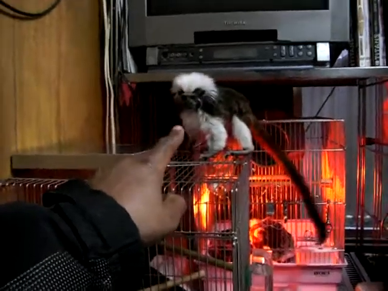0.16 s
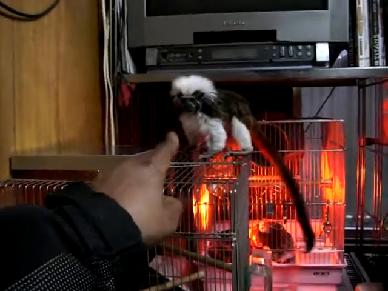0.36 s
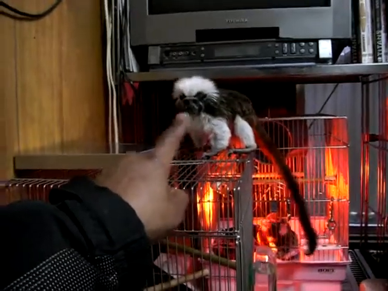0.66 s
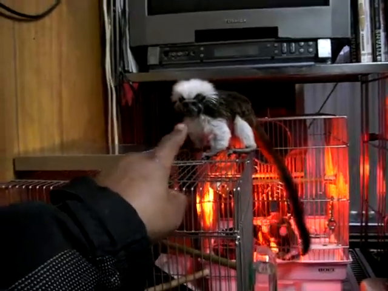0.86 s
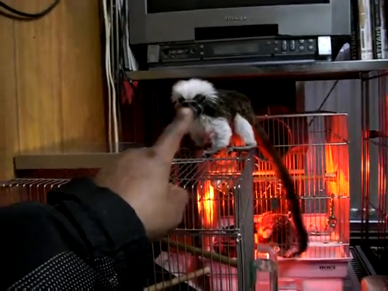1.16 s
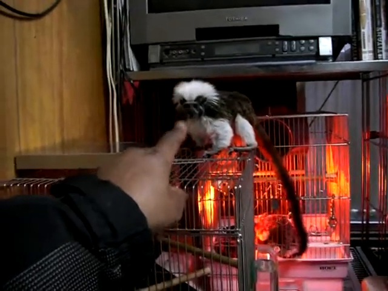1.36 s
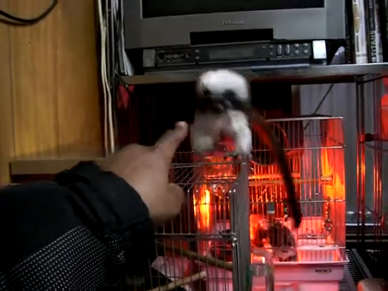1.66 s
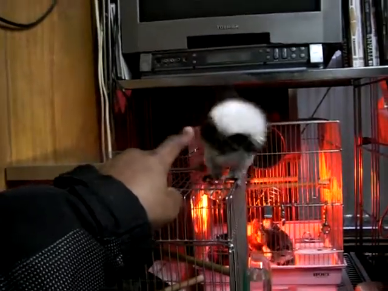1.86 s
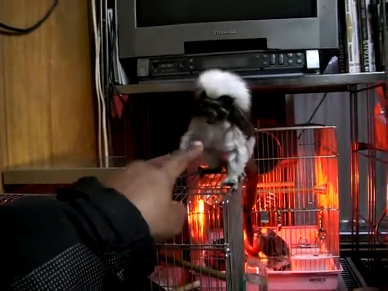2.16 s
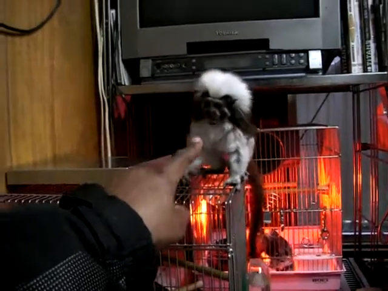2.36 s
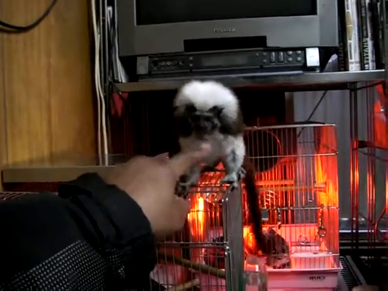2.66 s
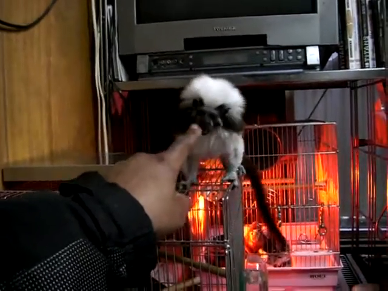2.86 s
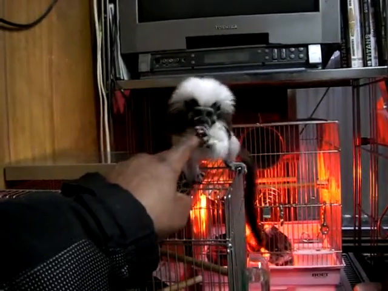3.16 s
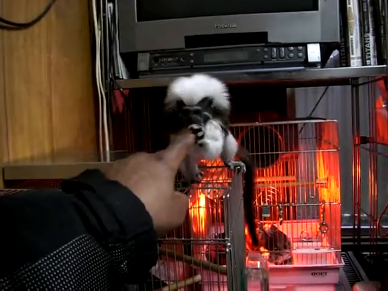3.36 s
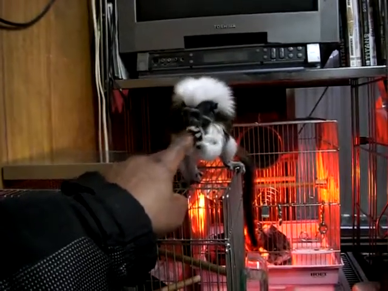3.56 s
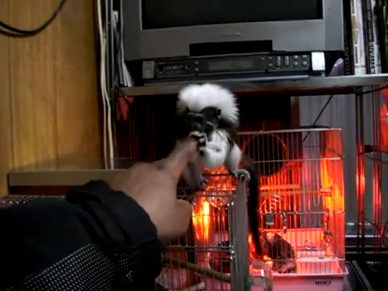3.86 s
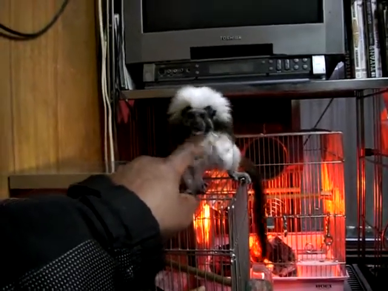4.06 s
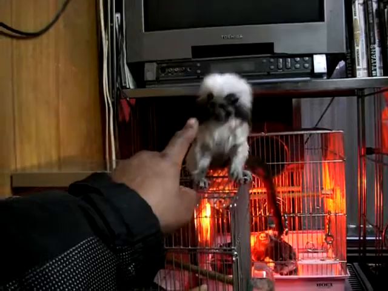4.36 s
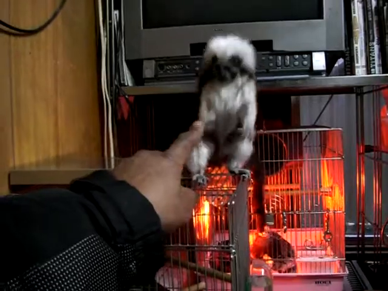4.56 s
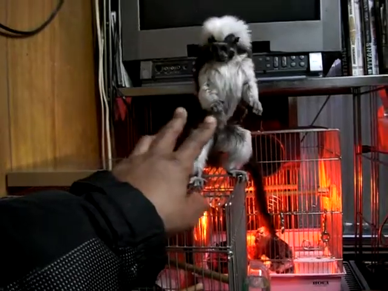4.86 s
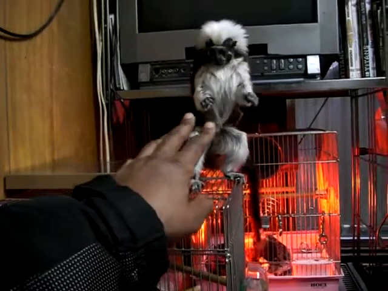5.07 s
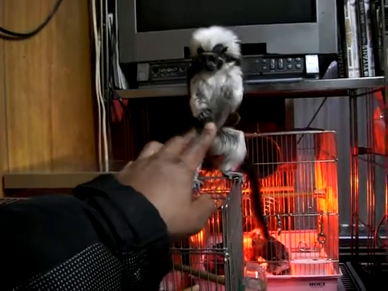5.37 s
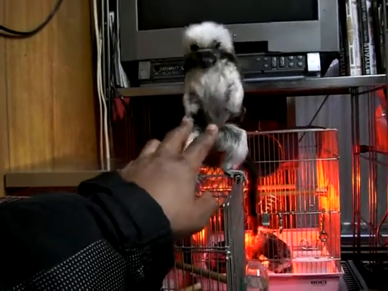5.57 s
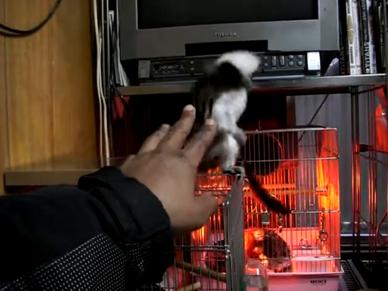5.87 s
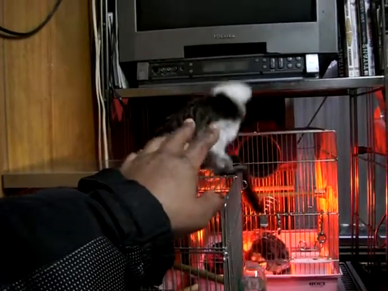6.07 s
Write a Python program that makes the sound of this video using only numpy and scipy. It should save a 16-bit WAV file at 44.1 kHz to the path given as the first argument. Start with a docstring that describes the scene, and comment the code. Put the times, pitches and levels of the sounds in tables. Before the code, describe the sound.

A small tamarin on a wire cage calls close by in a small room. A tiny falling peep leads straight into two long, slowly rising whistles that swell brighter. Soft foot thuds, faint scuffs and claw ticks on wire follow, then five very high, quick falling chirps and a whistle that plunges, levels and curls up. Steady low motor hum and soft room noise lie underneath, in stereo with a short room tail.

```python
"""A small tamarin calls from the top of a wire cage: a falling peep, two long whistles, five very high
chirps and a sliding whistle. Its voice is a wavering sum of harmonics, with a hiss that follows its loudness.
Its feet and claws add decaying thuds, filtered-noise scuffs and ticks that ring the resonant wires.
Nearby surfaces return treble echoes and a short diffuse tail.
Under it all an appliance hums as a set of sine lines over coloured room noise."""
import sys
import numpy as np
from scipy import signal
from scipy.fft import rfft, irfft
from scipy.io import wavfile

SR = 44100
rng = np.random.default_rng(int(sys.argv[2]) if len(sys.argv) > 2 else 0)


def transcribe(u):
    """Save the signal u as a 16-bit wav file named by the first command-line argument.

    u: samples, shape (n,) or (channels, n), limited to [-1, 1]; the rate is SR.
    q: integer samples, one column per channel.
    """
    v = np.clip(np.atleast_2d(u).T, -1, 1)
    q = np.round(v * 32767).astype(np.int16)
    wavfile.write(sys.argv[1], SR, q)


N = 273420
TIME = np.arange(N) / SR


def monkey():
    """Superposition: the calls add as independent pressure waves."""
    return peep() + long_whistles() + chirps() + sliding_whistle()


# throat resonance on the overtones of the peep: frequency_hz, relative_level_db
PEEP_RESONANCE = [(4200, 6.5), (6300, -5.5), (8400, -0.5), (10500, -7.5), (12500, -22), (16000, -30)]


def peep():
    """Source-filter principle: the throat colours the overtones of the opening peep."""
    return call(sagging_peep(), PEEP_RESONANCE, jitter=.005, hiss_db=-28, edge_s=0.0019,
                flutter_db=3.0, rasp_db=0.5)


PEEP_LENGTH_S, PEEP_HZ, PEEP_SAG_HZ, PEEP_SAG_S = .09, 2008, 284, .025
PEEP_DB, PEEP_OVERTONES_DB = -39, -44.5


def sagging_peep():
    """Exponential relaxation: the pitch settles to a steady value under level controls that stay even."""
    age = np.arange(0, PEEP_LENGTH_S, 1 / SR)
    pitch = PEEP_HZ + PEEP_SAG_HZ * np.exp(-age / PEEP_SAG_S)
    return age, pitch, PEEP_DB, PEEP_OVERTONES_DB


# long whistles, levels before the swell: start_s, length_s, fundamental_db, overtones_db, mouth_resonance_db,
# mouth_opens_after_s, fundamental_gain_db and overtone_gain_db at the widest opening
WHISTLE_SETTINGS = [(0.164, 0.348, -38, -37, -15, 0.17, 7.5, 5),
                    (0.621, 0.422, -37, -34.5, -4.5, 0.11, 3.5, 14.5)]
# pitch curve of each long whistle, a scoop up and then a slow climb: time_s, pitch_hz
WHISTLE_PITCH_CURVES = [
    [(0.163, 1488), (0.175, 1634), (0.191, 1690), (0.245, 1657), (0.389, 1708), (0.413, 1740),
     (0.477, 1755), (0.511, 1731)],
    [(0.621, 1424), (0.639, 1590), (0.663, 1709), (0.691, 1706), (0.927, 1776), (0.975, 1789),
     (1.031, 1813), (1.043, 1801)],
]
# throat resonance on the overtones of the whistles: frequency_hz, relative_level_db
WHISTLE_RESONANCE = [(3000, -4.5), (3500, -10), (5200, 0), (7000, 1.5), (8700, 1), (10400, -8),
                     (12200, -22.5), (15500, -24)]


def long_whistles():
    """Source-filter principle: the throat colours the overtones of two sustained tones."""
    return sum(call(whistle(pitch, *row), WHISTLE_RESONANCE, jitter=0.0016, hiss_db=-24.0, edge_s=.002,
                    flutter_db=2.5, rasp_db=-0.13, start_rasp_db=0.58)
               for pitch, row in zip(WHISTLE_PITCH_CURVES, WHISTLE_SETTINGS))


PUSH_DB, PUSH_AT_S, PUSH_WIDTH_S = 5.5, 0.022, 0.026  # the opening push brightens the tone
# the mouth snaps open to OPEN_SHARE; the other two are shares of the time that remains
OPEN_S, OPEN_SHARE, WIDEST_AT, WIDE_SHARE = 0.0032, 0.58, 0.65, 0.26
MOUTH_LIFT_DB = 23


def whistle(pitch_curve, start, length, fundamental_db, overtones_db, mouth_db, opens_s, swell_db, brighten_db):
    """Variable radiation: a whistle starts with a push and swells once the mouth opens."""
    age = np.arange(0, length, 1 / SR)
    pitch = np.interp(start + age, *np.transpose(pitch_curve))
    push = np.exp(-((age - PUSH_AT_S) / PUSH_WIDTH_S) ** 2)
    open_progress = (age - opens_s) / (length - opens_s)
    wide = np.exp(-((open_progress - WIDEST_AT) / WIDE_SHARE) ** 2)
    snap = (1 + np.tanh((age - opens_s) / OPEN_S)) / 2
    opening = snap * (OPEN_SHARE + (1 - OPEN_SHARE) * wide)
    return (start + age, pitch, fundamental_db + swell_db * opening,
            overtones_db + PUSH_DB * push + brighten_db * opening, mouth_db + MOUTH_LIFT_DB * opening)


# falling chirps: start_s, length_s, first_pitch_hz, last_pitch_hz before the final drop,
# bend (+ falls late, - falls early), final_drop (share of pitch), peak_db before colour, peak_after_s,
# last_overtones_db
CHIRP_SETTINGS = [(3.048, 0.046, 10050, 7570, 3, 0.18, -28.5, 0.023, -32),
                  (3.23, 0.031, 8500, 5850, 0.7, 0.12, -33.5, 0.0086, -39.5),
                  (3.631, 0.046, 10000, 7780, 1.3, 0.13, -28.5, 0.0084, -36),
                  (3.827, 0.055, 9200, 5400, -1.44, .08, -31, 0.0045, -42),
                  (4.024, 0.061, 7000, 3950, -0.85, 0.045, -33, 0.026, -42)]
# relative weights of a chirp's overtones; with a single overtone they leave its level unchanged:
# frequency_hz, relative_level_db
CHIRP_OVERTONE_WEIGHTS = [(8000, 2), (12000, -6), (30000, -53)]


def chirps():
    """Frequency modulation: five two-partial tones sweep rapidly downward."""
    return sum(call(chirp(*row), CHIRP_OVERTONE_WEIGHTS, jitter=0.006, hiss_db=-21, edge_s=0.0018, rasp_db=1.7,
                    flick_s=.0013, count=2) for row in CHIRP_SETTINGS)


# peaks and notches that a chirp's fundamental sweeps through: frequency_hz, gain_db
CHIRP_PEAKS_AND_NOTCHES = [(4000, 3), (4550, -0.5), (5150, 3), (5700, -0.5), (6300, -7.5), (6900, 1),
                           (8200, -3), (8700, 3.5), (9200, -1.5), (9750, 3), (10200, -2)]
CHIRP_DROP_S = 0.00264  # time constant of the final pitch drop
CHIRP_RISE_DB_PER_S, CHIRP_FADE_DB_PER_S, BRIGHTEN_DB_PER_S = 395, 242, 220


def chirp(start, length, first_hz, last_hz, bend, drop, peak_db, peak_s, overtones_db):
    """Swept excitation: a bent fall crosses fixed peaks and notches as the overtone grows."""
    age = np.arange(0, length, 1 / SR)
    fall = np.expm1(bend * age / length) / np.expm1(bend)
    final_drop = 1 - drop * np.exp((age - length) / CHIRP_DROP_S)
    pitch = (first_hz + (last_hz - first_hz) * fall) * final_drop
    below_peak_db = np.maximum(CHIRP_RISE_DB_PER_S * (peak_s - age), CHIRP_FADE_DB_PER_S * (age - peak_s))
    level_db = peak_db - below_peak_db + at_hz(CHIRP_PEAKS_AND_NOTCHES, pitch)
    return start + age, pitch, level_db, overtones_db - BRIGHTEN_DB_PER_S * (length - age)


# course of the sliding whistle: time_s, pitch_hz, fundamental_db, overtones_db
SLIDE_COURSE = [(4.51, 4997, -41, -47), (4.526, 5180, -31.5, -34.5), (4.538, 5460, -32.5, -41),
                (4.564, 4260, -40.5, -36), (4.582, 3760, -42, -40), (4.614, 2603, -45, -48),
                (4.628, 2460, -38, -41), (4.674, 2240, -39, -45), (4.72, 2177, -33, -42.5),
                (4.8, 2150, -30.5, -38.5), (4.844, 2185, -35, -41.5), (4.946, 2476, -37, -39),
                (4.965, 2654, -43.5, -46)]
# throat resonance on the overtones of the slide: frequency_hz, relative_level_db
SLIDE_RESONANCE = [(4400, -4), (6500, -4.5), (8700, -6.5), (10900, 1.5), (13000, -3), (15200, -8),
                   (30000, -40)]


def sliding_whistle():
    """Source-filter principle: gliding harmonics pass through fixed resonances."""
    return call(np.transpose(SLIDE_COURSE), SLIDE_RESONANCE, jitter=0.0036, hiss_db=-24.5, edge_s=0.0022,
                flutter_db=3.5, rasp_db=0.13, start_rasp_db=0.8)


# hiss that rides on the voice: frequency_hz, relative_level_db (per Hz)
HISS_SPECTRUM = [(1200, -2.5), (2500, -2.5), (6000, -3.5), (10000, -4), (16000, -4)]
# voice at two microphones: frequency_hz, left_minus_right_db, left_phase_lead_rad
VOICE_BEARING = [(1700, -1.5, 0.055), (3505, -4.5, 0.13), (5260, -4.5, 1.3), (6770, -6, 1.5),
                 (8700, -1.5, 1.67), (11150, -4.5, 1.96), (16000, -3, 2.9)]
MOUTH_HZ, MOUTH_WIDTH_HZ = 6660, 2300
HOLLOW_HZ, HOLLOW_SHARE = 3730, 0.49  # thinning near the octave below, as a share of the mouth lift
ROUGH_START_S = .05  # a call with start_rasp_db is roughest as it starts
TREMBLE_DB, TREMBLE_PER_S = 0.74, 44
WAVER, WAVER_PER_S = .0025, 35  # WAVER is a share of the pitch
FLUTTER_PER_S = 39


def bell(hz, centre_hz):
    """Resonance curve: a Gaussian weight around a centre frequency."""
    return np.exp(-((hz - centre_hz) / MOUTH_WIDTH_HZ) ** 2)


def call(controls, throat, jitter, hiss_db, edge_s, rasp_db, flutter_db=0, start_rasp_db=0,
         flick_drop=0.078, flick_s=.004, count=9):
    """Fourier synthesis: harmonics of a wavering pitch, weighted by frequency, carry a following hiss."""
    s, *columns = np.broadcast_arrays(*controls)
    on = (TIME > s[0] - edge_s) & (TIME < s[-1] + flick_s)
    t = TIME[on]
    pitch, fundamental_db, overtones_db, *mouth_db = [np.interp(t, s, c) for c in columns]
    pitch = pitch * (1 + WAVER * drift(WAVER_PER_S)[on])

    # as the call ends, the pitch flicks downward and the tone snaps shut
    closing = np.clip((t - s[-1]) / flick_s, 0, 1)
    onset = np.sin(np.pi / 2 * np.clip((t - s[0] + edge_s) / (2 * edge_s), 0, 1)) ** 2
    gate = onset * (1 - closing ** 2)
    k = np.arange(1, count + 1)[:, None]
    hz = k * pitch * (1 + jitter * drift(200)[on]) * (1 - flick_drop * closing)

    # an opening mouth lifts the overtone in its resonance and thins the octave below
    lift_db = sum(mouth_db) * (bell(hz[1:], MOUTH_HZ) - HOLLOW_SHARE * bell(hz[1:], HOLLOW_HZ))
    colour = from_db(at_hz(throat, hz[1:]) + lift_db)
    # successive stretches of one drift make each overtone flutter on its own
    colour *= from_db(flutter_db * np.resize(drift(FLUTTER_PER_S), colour.shape))
    overtones = from_db(overtones_db) * colour / np.linalg.norm(colour, axis=0)
    below_nyquist = hz < SR / 2
    height = np.sqrt(2) * np.vstack([from_db(fundamental_db), overtones]) * gate * below_nyquist

    # uneven vibration puts a noisy skirt around each partial
    rough_db = rasp_db + start_rasp_db * np.exp(-((t - s[0]) / ROUGH_START_S) ** 2)
    height *= from_db(rough_db * drift(900)[on] + TREMBLE_DB * drift(TREMBLE_PER_S)[on])

    phase = 2 * np.pi * np.cumsum(hz, axis=1) / SR
    balance = from_db(at_hz(VOICE_BEARING, hz))
    lead = at_hz(VOICE_BEARING, hz, axis=2)
    right = height * np.sqrt(2 / (1 + balance ** 2))  # keeps the mean power of the two sides
    out = np.zeros((2, N))
    out[:, on] = [(right * balance * np.sin(phase + lead)).sum(0), (right * np.sin(phase)).sum(0)]

    freqs = np.fft.rfftfreq(len(t), 1 / SR)
    hiss_bins = rfft(rng.standard_normal((2, len(t)))) * from_db(at_hz(HISS_SPECTRUM, freqs))
    hiss = rms_one(irfft(hiss_bins, len(t)))
    out[:, on] += hiss * from_db(hiss_db) * np.linalg.norm(height, axis=0)
    return out


# soft landings of the feet: start_s, level_db, pitch_hz, ring_time_s (to fall 60 dB)
FOOT_LANDINGS = [(1.69, -55, 426, 0.14), (1.835, -42, 334, 0.22)]


def landings(rise_s=0.0056):
    """Damped oscillation: a soft foot sets the cage frame thudding with exponential decay."""
    out = np.zeros(N)
    for s, level_db, hz, t60 in FOOT_LANDINGS:
        age = np.clip(TIME - s, 0, 2)
        envelope = from_db(level_db - 60 * age / t60) * (1 - np.exp(-age / rise_s))
        out += envelope * np.sin(2 * np.pi * hz * age)
    return out


# feet and hands scuffing the cage: start_s, length_s before stretching, level_db before cage gain, centre_hz
CAGE_SCUFFS = [(1.676, 0.07, -58, 2100), (1.751, 0.057, -65.5, 7000), (1.83, 0.043, -56.5, 11000),
               (1.922, 0.051, -66, 9000), (2.331, 0.027, -66, 5200), (2.361, 0.057, -59, 4650),
               (2.458, 0.076, -65, 6000), (2.832, .05, -65.5, 8900), (5.698, 0.045, -66, 9900),
               (5.77, 0.089, -60.5, 8100), (6.01, .07, -69, 10000), (6.108, 0.045, -68.5, 9800)]
# claws ticking on a wire: start_s, level_db before the high-pass and cage gain
CLAW_TICKS = [(2.109, -45), (2.12, -53), (2.325, -46.5)]
# resonances of the cage wires: frequency_hz, width_hz, gain_db before cage gain
WIRE_RESONANCES = [(4920, 390, 7), (6660, 20, 13), (8660, 90, 2), (10490, 140, -12), (12900, 110, 0)]


def cage(grain_db=1.5, spread=1.34, tick_s=0.00081, stretch=1.46, gain_db=2.0):
    """Driven resonance: grainy scuffs and sharp claw ticks set the wires ringing."""
    touch = np.zeros((2, N))
    grains = rng.standard_normal((2, N)) * from_db(grain_db * drift(300))
    for s, length, level_db, hz in CAGE_SCUFFS:
        start, size = int(s * SR), int(length * stretch * SR)
        stroke = np.sin(np.pi * np.linspace(0, 1, size) ** 0.47)  # peaks early
        band = butter(grains[:, start:start + size], [hz / spread, hz * spread], "band", order=1)
        rub = rms_one(band)
        touch[:, start:start + size] += from_db(level_db) * rub * stroke[:rub.shape[1]]

    for s, level_db in CLAW_TICKS:
        decay = (TIME >= s) * np.exp(-np.abs(TIME - s) / tick_s)
        touch += from_db(level_db) * butter(grains, 1550, "high") * decay

    rings = np.zeros((2, N))
    for hz, width, db in WIRE_RESONANCES:
        peak = signal.iirpeak(hz, hz / width, fs=SR)
        rings += from_db(db) * signal.lfilter(*peak, touch + 1e-18)  # tiny offset avoids denormals
    return from_db(gain_db) * (touch + rings)


# treble echoes of nearby shelves and walls, a list for left and one for right: delay_ms, gain_db
NEAR_ECHOES = [
    [(1.7, -21), (3.9, -24), (6.8, -30.5)],
    [(1.3, -16.5), (2.9, -26), (5.6, -21)],
]
ROOM_T60_S = .2


def room(x, wet_db=-18, wall_hz=7000, onset_s=0.0049):
    """Reflection and reverberation: near surfaces return the treble, then a diffuse tail decays."""
    treble = butter(x, 3760, "high", order=1)
    early = np.zeros_like(x)
    for channel, taps in enumerate(NEAR_ECHOES):
        for ms, db in taps:
            early[channel] += from_db(db) * np.interp(TIME - ms / 1000, TIME, treble[channel], left=0)

    t = TIME[:SR // 2]
    diffuse = butter(rng.standard_normal((2, len(t))), wall_hz, "low")
    tail = diffuse * from_db(-60 * t / ROOM_T60_S) * (t > onset_s)
    tail /= np.linalg.norm(tail, axis=1, keepdims=True)
    return x + early + from_db(wet_db) * signal.fftconvolve(x, tail, axes=1)[:, :N]


# lines of the motor's hum: mean_frequency_hz, level_db (rms, before waver and left-right balance)
HUM_LINES = [(32, -56.5), (98.5, -55), (197, -58), (295.5, -65.5), (394, -60.5), (492, -66), (590, -69.5),
             (688, -68)]
# room noise, with the narrow rush of a fan near 1.9 kHz: frequency_hz, relative_level_db (per Hz)
FLOOR_SPECTRUM = [(12, -28.5), (28, -1), (70, -5.5), (130, -4.5), (420, -10), (600, -13), (980, -14.5),
                  (1250, -21), (1740, -20), (1910, -16.5), (2080, -23.5), (4000, -29.5), (7000, -38),
                  (16000, -48)]
FLOOR_DB = -50  # rms of the middle, before left-right balance


def background(waver_db=2.5, wander_hz=1.404):
    """Line and broadband spectra: a motor's wavering hum lies over the noise of the room."""
    hum = np.zeros(N)
    for hz, db in HUM_LINES:
        phase = 2 * np.pi * np.cumsum(hz + wander_hz * drift(5.27)) / SR
        hum += np.sqrt(2) * from_db(db + waver_db * drift(5.8)) * np.sin(phase)
    floor = from_db(FLOOR_DB) * stereo_noise(FLOOR_SPECTRUM)
    return (hum + floor) * from_db([[-.6], [.6]])


# left-right correlation of the room noise, limited when read: frequency_hz, correlation (-1 to 1)
NOISE_LIKENESS = [(60, 0.83), (130, 0.87), (290, 0.86), (640, 0.82), (1410, 0.68), (3100, 0.1),
                  (6820, -0.72), (15000, -0.84)]


def stereo_noise(spectrum):
    """Interaural coherence: noise alike in the bass and opposed in the treble; its middle has rms 1."""
    hz = np.fft.rfftfreq(N, 1 / SR)
    alike = np.clip(at_hz(NOISE_LIKENESS, hz), -.85, .99)
    mid_bins, side_bins = rfft(rng.standard_normal((2, N))) * from_db(at_hz(spectrum, hz))
    mid = irfft(mid_bins, N)
    side = irfft(side_bins * np.sqrt((1 - alike) / (1 + alike)), N)
    return np.array([mid + side, mid - side]) / mid.std()


def from_db(db):
    """Logarithmic level: decibels become amplitude gain."""
    return 10 ** (np.asarray(db) / 20)


def rms_one(x):
    """Power normalisation: scale to unit mean square."""
    return x / np.sqrt(np.mean(x ** 2) + 1e-20)


def at_hz(points, hz, axis=1):
    """Logarithmic frequency scale: interpolate one column of a spectrum table."""
    table = np.array(points)
    return np.interp(np.log(hz + 1e-9), np.log(table[:, 0]), table[:, axis])


def butter(x, hz, kind, order=2):
    """Maximally flat response: a causal Butterworth filter."""
    sos = signal.butter(order, np.clip(hz, 10, .47 * SR), kind, fs=SR, output="sos")
    return signal.sosfilt(sos, x)


def drift(rate):
    """Low-passed noise: a smooth random wander of spread 1 with about this many turns a second."""
    r = np.exp(-2 * np.pi * rate / SR)
    noise = rng.standard_normal(N + SR)
    return rms_one(signal.lfilter([1], [1, -2 * r, r * r], noise)[SR:])  # drop the settling second


def scene():
    """Superposition: the monkey and its cage sound in the room, over the hum."""
    return room(from_db(-.5) * monkey() + cage() + landings()) + background()


CUTOFF_HZ = 16100


def record(dry):
    """Band limitation: an elliptic low-pass cuts the top steeply."""
    return signal.sosfilt(signal.ellip(10, .1, 70, CUTOFF_HZ, fs=SR, output="sos"), dry)


dry = scene()
out = record(dry)
transcribe(out)
```